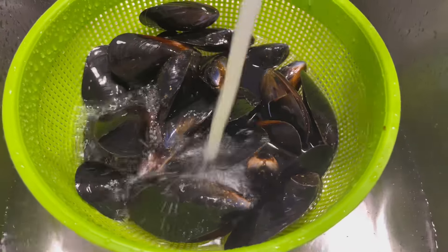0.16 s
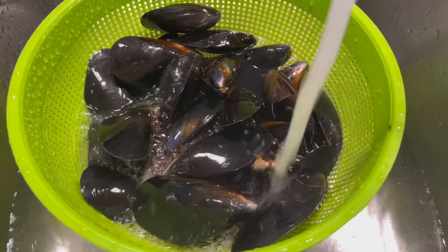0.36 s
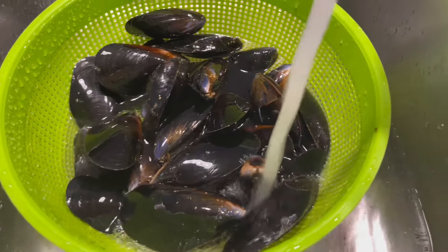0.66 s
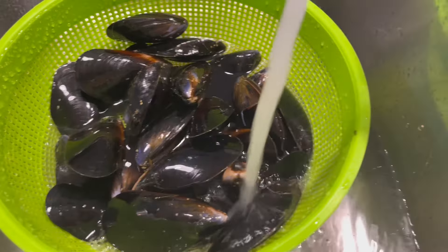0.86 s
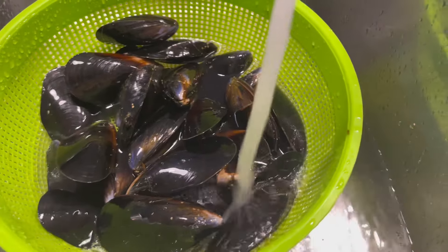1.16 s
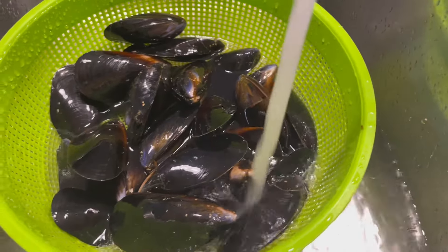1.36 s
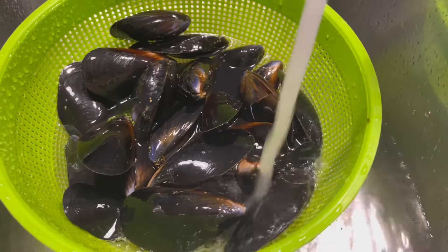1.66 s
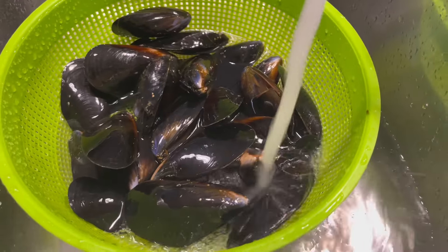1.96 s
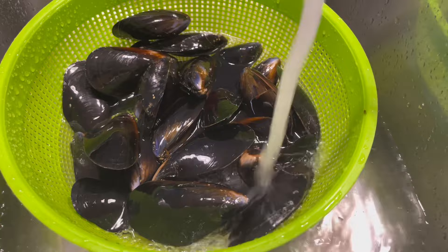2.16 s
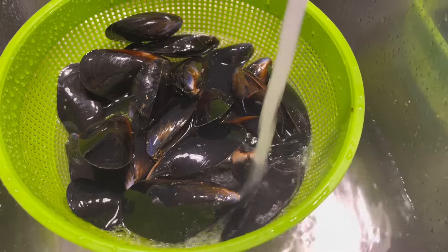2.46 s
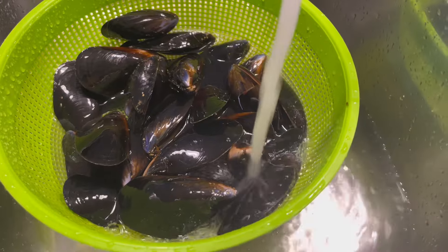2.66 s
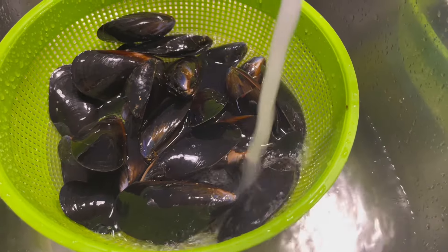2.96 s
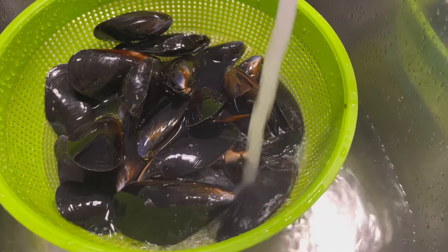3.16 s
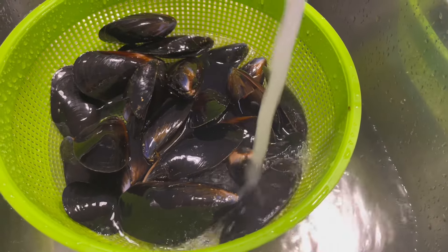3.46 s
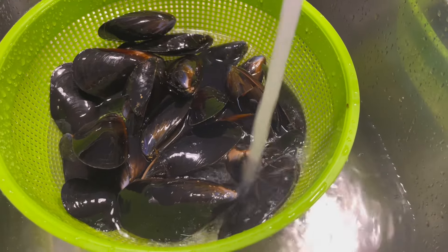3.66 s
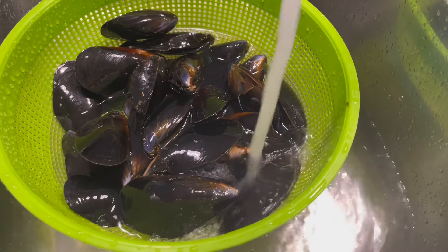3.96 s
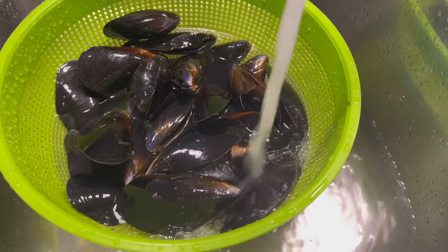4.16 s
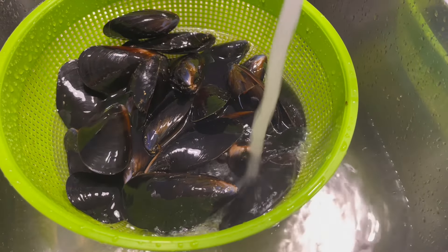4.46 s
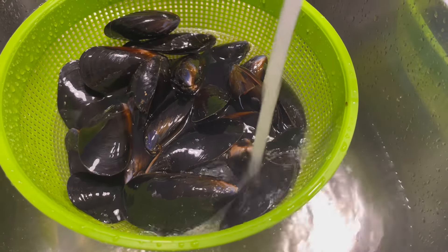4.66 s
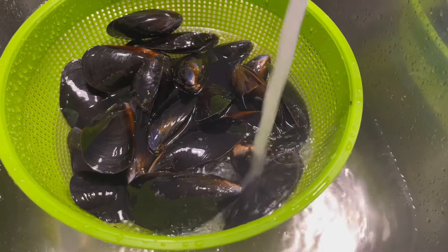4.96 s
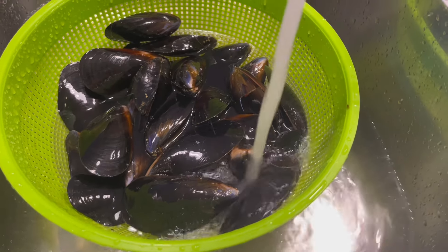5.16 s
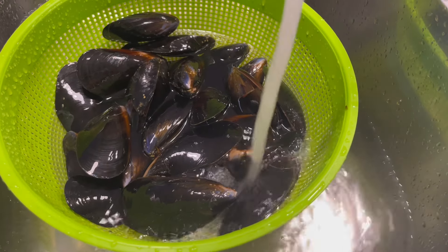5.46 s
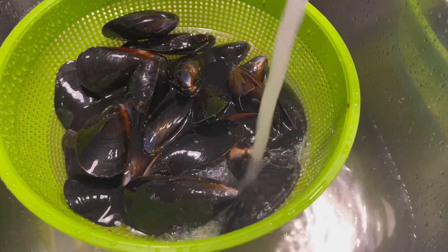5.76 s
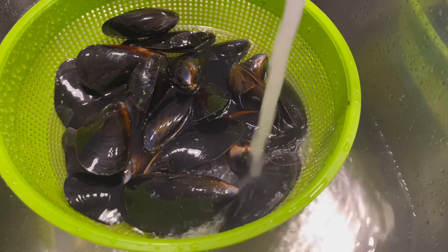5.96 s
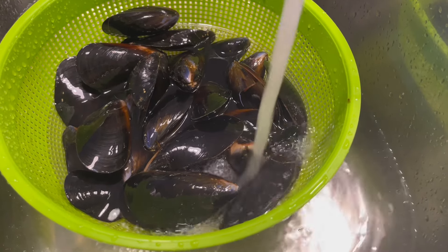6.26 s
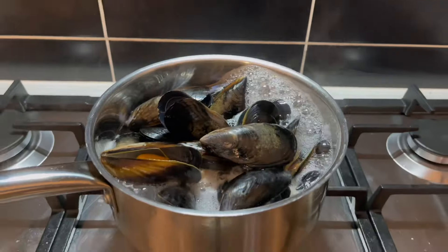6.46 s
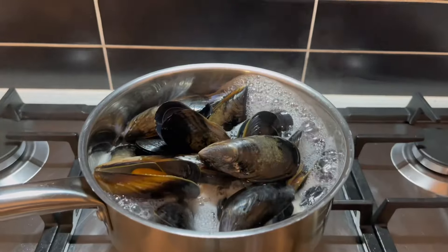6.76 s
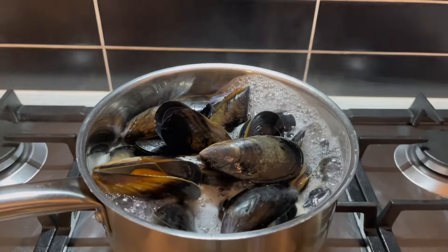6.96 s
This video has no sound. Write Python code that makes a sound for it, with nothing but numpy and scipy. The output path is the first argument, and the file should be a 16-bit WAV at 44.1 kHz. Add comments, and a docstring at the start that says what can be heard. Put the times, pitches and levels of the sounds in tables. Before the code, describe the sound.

Tap water splashes steadily onto mussels in a colander, with thuds against the steel sink, then a pot simmers faintly.

```python
"""A kitchen sink, then a stove: a tap runs onto mussels in a plastic colander that stands in a steel basin.
The jet spatters as filtered random impacts, bubbles and air gaps ring as sines and resonances,
run-off patters on the steel, air glugs, and struck modes make the basin thud, rumble and clack.
Then, abruptly, a pot of mussels simmers on a gas burner: coloured noise, small bubbles, sizzling foam, soft pops."""
import sys
import numpy as np
from scipy import signal
from scipy.fft import rfft, irfft
from scipy.io import wavfile
from scipy.ndimage import uniform_filter1d

SR = 44100
rng = np.random.default_rng(int(sys.argv[2]) if len(sys.argv) > 2 else 0)


def digitize_waveform(pressure):
    """Quantize a signal to 16-bit integers and store it at the path in sys.argv[1].

    Rows of a 2-D input are taken as channels; values are limited to [-1, 1].
    """
    field = np.atleast_2d(pressure).T
    bounded = np.clip(field, -1, 1)
    quanta = np.round(bounded * 32767).astype(np.int16)
    wavfile.write(sys.argv[1], SR, quanta)


N = 313545
T = np.arange(N) / SR
HZ = np.fft.rfftfreq(N, 1 / SR) + 1e-3
# The sink gives way to the stove [s]; top of the audible band [Hz]
CUT_S, TOP_HZ = 6.448, 15800

# The jet sweeps over bare shells, then settles in one place: (time [s], relative spray level [dB])
JET_SWEEP = [(0, -28), (.18, -26.5), (.33, -32), (.44, -27), (.6, -30), (1.1, -30.5), (2.5, -31.5),
             (6.4, -30)]
# Fill of the pocket between the shells where the jet lands: (time [s], relative level of its ring [dB])
POCKET_FILL = [(0, -13), (.3, -5), (.45, -9), (.65, 4), (1.5, 4), (3.5, 3.5), (5, 3), (6.45, 1.7)]
# Air gaps between the shells: (frequency [Hz], nominal width [Hz], relative level [dB])
AIR_GAPS = [(1574, 64, -14.5), (1854, 190, -5.5), (2170, 156, -3.5), (2410, 180, -4), (2590, 67, -4),
            (2757, 154, 3), (2940, 86, -4), (3035, 74, 0.5), (3265, 82, -3.5)]
# Spectrum of droplets ticking on shell: (frequency [Hz], relative density [dB per Hz])
SPRAY_SPECTRUM = [(1000, -29), (2000, -13), (4000, -31), (6200, -15), (8300, -12), (9300, -1), (9900, -5.5),
                  (10600, 5.5), (11250, 0), (12300, -9.5), (13200, -18.5), (14000, -52), (15200, -22.5)]
# Spectrum of water churning between the shells: (frequency [Hz], relative density [dB per Hz])
WASH_SPECTRUM = [(700, -18), (1050, -8.5), (1330, 2), (2000, -5), (3300, 2.5), (3900, -1.5), (4900, -1),
                 (5350, -1.5), (5750, -2.5), (6300, 0.5), (7300, -3.5), (8400, -1.5), (9000, 1),
                 (10100, -48), (11200, 9), (13000, -27)]
# Spectrum of run-off on the steel: (frequency [Hz], relative density [dB per Hz])
RUNOFF_SPECTRUM = [(25, -35), (55, -5), (110, -6.5), (180, -6.5), (300, -1.5), (450, 0.5), (620, 1.5),
                   (800, -7), (1100, -12.5), (2000, -39)]
# Spectrum of the gas burner: (frequency [Hz], relative density [dB per Hz])
BURNER_SPECTRUM = [(18, -37.5), (30, -18), (92, 1), (192, -12.5), (267, -6), (600, -17.5), (1000, -14),
                   (1750, -12), (3300, -31), (5910, -28), (6890, -38), (8200, -23), (8900, -36),
                   (10100, -50), (11400, -34), (13000, -52)]
# Spectrum of sizzling foam: (frequency [Hz], relative density [dB per Hz])
SIZZLE_SPECTRUM = [(1200, -21), (2200, -6), (2700, 0), (3400, -11), (4700, -9), (5700, -4), (6700, -11),
                   (8000, -3), (9000, -5), (10300, -17), (13000, -39)]
# Spectrum of a hard knock on the basin: (frequency [Hz], relative density [dB per Hz])
CLACK_SPECTRUM = [(40, -45), (400, -27), (900, -15), (1200, -13.5), (1400, -10.5), (1700, -7), (2100, -9),
                  (2600, -15), (3600, -24), (4700, -15), (5600, -27), (7000, -28.5), (13000, -53)]
# Spray between the two channels: (frequency [Hz], phase by which the right leads [rad])
SPRAY_LEAD = [(3000, 0.36), (8500, 1.33), (9300, 1.74), (10100, np.pi), (10500, 3.38), (11100, 4.72),
              (11750, 2 * np.pi)]
# Big drops that smack the shells: (time [s], relative peak [dB])
BIG_DROPS = [(0.241, -17.5), (1.124, -23), (2.157, -21), (2.668, -20), (2.9283, -24), (3.8761, -18),
             (4.6144, -21), (4.9283, -30), (5.039, -25.5), (5.091, -18), (5.5493, -20), (5.7997, -19)]
# The jet catches hollow shells and gulps:
# (middle [s], level before its swell [dB], centre [Hz], nominal width [Hz], length [s])
SHELL_GULPS = [(0.162, -35.5, 1640, 600, 0.051), (0.217, -39, 1470, 500, 0.065),
               (0.291, -28.5, 2000, 1500, 0.018), (0.368, -34.5, 2300, 800, 0.022),
               (0.521, -33, 2240, 600, 0.023), (0.68, -36, 2300, 800, 0.062),
               (2.397, -32, 2370, 400, 0.016), (3.15, -28, 2770, 400, .012),
               (3.733, -33, 2760, 400, 0.0086), (3.9, -29, 2750, 400, 0.01), (5.072, -28, 2800, 400, .012),
               (6.231, -30.5, 2800, 700, .014)]
# Air glugs in the draining water: (time [s], direct peak [dB], starting pitch [Hz], length [cycles])
AIR_GLUGS = [(3.066, -34, 330, 7), (3.098, -39, 205, 9), (3.14, -33, 190, 4), (3.932, -34, 310, 12),
             (4.478, -19.5, 249, 7), (4.490, -22, 473, 15), (4.504, -21.5, 278, 9.1), (4.523, -21, 233, 5),
             (4.544, -21.5, 240, 6), (4.560, -20, 450, 8.1), (4.576, -26.5, 212, 5.5),
             (4.596, -25.5, 181, 3), (4.640, -25, 215, 4.1), (4.689, -35, 219, 7), (5.682, -19.5, 268, 6.7),
             (5.71, -25.5, 255, 4.5)]
# Modes of the steel basin: (frequency [Hz], relative level [dB], t60 [s])
BASIN_MODES = [(78.5, -25, 0.41), (98.2, -21.5, 0.45), (175.8, -4.5, 0.31), (222.6, -14.5, 0.43),
               (258, -15.5, 0.19), (301, -8.5, 0.39), (341.5, -4, 0.23), (389.5, -13.5, .25),
               (483, -26, 0.13), (542, -12, 0.49), (642, -12, 0.23), (730, -8, 0.14), (820, -13, 0.12)]
# Blows on the basin: (time [s], thud level [dB], push on the modes [dB], contact time [ms])
BASIN_BLOWS = [(-.004, -23, -36, 1.5), (0.0136, -29.5, -38, 0.82), (0.2134, -22.5, -42, 1.2),
               (0.6207, -15.5, -42, 0.56), (0.8368, -21.5, -37, 0.87), (1.864, -29.5, -53, 1.6),
               (3.917, -35, -20, 3.3), (4.306, -45, -52, 1.5), (4.4776, -28, -36, 1.8),
               (4.553, -41, -38, 1.2), (4.584, -30, -30, 2.4), (5.675, -26, -29.5, 0.99),
               (5.9479, -23, -10, 3.4)]
# The load shifts and the basin rumbles:
# (time [s], rumble level [dB], centre [Hz], swell [s], t60 [s], level of the floor's boom [dB])
LOAD_SHIFTS = [(0.547, -40.5, 191, .01, 0.32, -64), (3.015, -38.5, 403, 0.016, 0.62, -39),
               (3.045, -36, 201, .025, 0.48, -33), (3.17, -51, 200, .04, .9, -41),
               (4.306, -37, 284, 0.0044, 0.7, -46), (4.478, -28.5, 252, 0.0036, 0.93, -56),
               (4.555, -35, 250, .005, 0.27, -34.5), (4.64, -37, 250, .005, 0.3, -49),
               (4.735, -33, 255, 0.012, 0.64, -41), (5.03, -38, 290, .02, 0.84, -47),
               (5.676, -29.5, 270, .01, 0.74, -30), (5.928, -29, 215, 0.023, 0.67, -40)]
# Hard knocks on the basin, the loudest among light touches and rebounds: (time [s], relative peak [dB])
HARD_KNOCKS = [(0.6214, -16), (5.94, -26), (5.943, -17), (5.946, -1.5), (5.9518, -20), (5.959, -16),
               (5.975, -21), (5.991, -16)]
# Bubbles that burst in the pot: (time [s], ring peak [dB], pitch [Hz], length [cycles])
POT_POPS = [(6.504, -42, 1550, 4), (6.5872, -39, 1630, 4), (6.618, -53, 5800, 5), (6.624, -51, 5500, 6),
            (6.63, -37, 6370, 7.1), (6.630, -45, 1680, 4.4), (6.757, -49, 1100, 7.2), (6.776, -45, 1450, 3),
            (6.7833, -46, 1600, 6), (6.7874, -35, 1350, 3.8), (6.793, -48, 6000, 4), (6.807, -45, 1400, 5),
            (6.909, -31, 1470, 4.8), (7.0803, -47, 8800, 7.4)]
# Foam swells and collapses in puffs: (time [s], relative level [dB])
FOAM_PUFFS = [(6.61, -59), (6.66, -69), (6.755, -64)]

# The flow is never quite even: slow surges and a quick flutter [dB]
SURGE_DB, FLUTTER_DB = 0.84, 0.93
# Random smaller drops: middle of the relative peaks and their reach either way [dB]
DROP_DB, DROP_SPREAD_DB = -21.5, -5
# Bubbling between the shells [dB], and the share of the pocket's fill it follows
CHURN_DB, CHURN_FOLLOWS = -37, 0.059
# Splash and gulps reach the right later [ms]
SPLASH_LAG_MS = 0.4956
# Each gap fills and drains on its own: slow and quick level change [dB], pitch waver [share]
GAP_SWAY_DB, GAP_FLICKER_DB, GAP_WOBBLE = -0.06, 2.0, .008
# A glug's phase runs ahead by this share per unit of age, so its pitch rises
GLUG_GLIDE = 0.0039
# Share of the pocket's fill that the run-off follows
RUNOFF_FOLLOWS = .15
# Low judder after each thud: level against the thud [dB], centre [Hz], t60 [s]
AFTER_DB, AFTER_HZ, AFTER_T60_S = -15, 112, 0.19
# The floor booms after a shift: delay [s], centre [Hz], t60 [s]
BOOM_LAG_S, BOOM_HZ, BOOM_T60_S = 0.0129, 61, 0.41
# Hard shifts rattle: level [dB] at a rumble of HARD_DB, dB gained per dB of rumble, centre [Hz], t60 [s]
HARD_DB, RATTLE_DB, RATTLE_GROWTH, RATTLE_HZ, RATTLE_T60_S = -28, -29.5, 2.1, 580, 0.38
# Froth wells up once: middle [s], length [s], level before its swell [dB]
WELL_S, WELL_LENGTH_S, WELL_DB = 6.685, .115, -60
# Foam puffs: attack [s], t60 [s]; steady sizzle between them [dB]
PUFF_ATTACK_S, PUFF_T60_S, FOAM_DB = 0.021, 0.25, -72.5
# The film of a bursting bubble snaps: level against the pop [dB], t60 [s]
SNAP_DB, SNAP_T60_S = -26, .006


def undb(db):
    """Decibels to gain."""
    return 10 ** (np.asarray(db) / 20)


def level(x, db):
    """Set the rms level."""
    return x * undb(db) / np.sqrt(np.mean(x ** 2))


def curve(rows):
    """A time table joined by straight lines."""
    return np.interp(T, *np.transpose(rows))


def since(s):
    """Seconds since a moment, zero before it."""
    return np.maximum(T - s, 0)


def pan(db):
    """Gains of left and right for a level difference; positive leans left."""
    return undb(np.array([[db], [-db]]) / 2)


def colour(x, points):
    """Minimum-phase filter with the given spectrum."""
    hz, db = np.transpose(points)
    grid_hz = np.fft.rfftfreq(4096, 1 / SR) + 1
    gain = undb(np.interp(np.log(grid_hz), np.log(hz), db))
    cepstrum = irfft(np.log(gain))
    # Folding the cepstrum forward makes the response causal
    cepstrum[1:2048] *= 2
    cepstrum[2049:] = 0
    response = irfft(np.exp(rfft(cepstrum)))
    return signal.oaconvolve(np.atleast_2d(x), response[None], axes=1)[:, :x.shape[-1]]


def band(x, hz, width):
    """A resonance with gain 1 at its centre."""
    return signal.lfilter(*signal.iirpeak(min(hz, .45 * SR), hz / width, SR), x)


def walk(rate):
    """Smooth random drift with a spread near 1; rate is new values per second."""
    k = int(SR / rate)
    steps = np.repeat(rng.standard_normal(N // k + 1), k)
    return 1.3 * uniform_filter1d(uniform_filter1d(steps, k), k)[:N]


def impacts(rate, spread_db):
    """Random tiny impacts, most weak and a few strong."""
    size = undb(spread_db * np.minimum(rng.exponential(size=N), 6))
    hits = rng.random(N) < rate / SR
    return level(hits * size * rng.choice([-1, 1], N), 0)


def stereo(draw, apart, lag_ms=0.):
    """Two draws of a sound as middle and side; the right may arrive later."""
    left, right = draw() + apart * draw() * np.array([[1], [-1]])
    t = T[:len(left)]
    return np.array([left, np.interp(t - lag_ms / 1000, t, right)])


def add(out, s, x):
    """Mix x into out at time s."""
    i = int(round(s * SR))
    x = x[..., max(-i, 0):max(N - i, 0)]
    out[..., max(i, 0):max(i, 0) + x.shape[-1]] += x


def room(x, t60, wet_db, lag_ms=0.):
    """The direct sound, optionally later on the right, and a dense tail of reflections."""
    t = T[:SR // 2]
    tail = rng.standard_normal((2, len(t))) * undb(-60 * t / t60) * (t > .001)
    tail *= undb(wet_db) / np.sqrt(np.sum(tail[0] ** 2))
    x = x.ravel()
    direct = np.array([x, np.interp(T - lag_ms / 1000, T, x)])
    return direct + signal.oaconvolve(x[None], tail, axes=1)[:, :N]


def bubbles(centre_hz, octaves, cycles, glide, spread_db, count):
    """Small bubbles ring and rise in pitch, each from its own place."""
    out = np.zeros((2, N))
    places = rng.random((count, 2))
    characters = rng.standard_normal((count, 2))
    sizes = rng.exponential(size=count)
    for when, lag, pitch, side, size in np.column_stack([places, characters, sizes]):
        hz = centre_hz * 2 ** (octaves * np.clip(pitch, -2.5, 2.5))
        t = T[:int(SR * cycles / hz) + 1]
        arrival_s = np.array([[lag], [1 - lag]]) * 0.00035
        age = np.maximum(t - arrival_s, 0) * hz / cycles  # falls 60 dB by age 1
        ring = np.sin(2 * np.pi * cycles * age * (1 + glide * age)) * undb(-60 * age)
        add(out, when * T[-1], ring * undb(spread_db * min(size, 4)) * pan(2 * side))
    return out


def spray(jet_db):
    """Droplets tick and smack on the shells; their sharp treble reaches the two channels out of step."""
    ticks = level(colour(impacts(rate=9000, spread_db=3.0), SPRAY_SPECTRUM), 3.65)
    ticks = ticks * undb(jet_db + FLUTTER_DB * walk(50))
    small_drops = [(when * CUT_S, DROP_DB + DROP_SPREAD_DB * (2 * size - 1))
                   for when, size in rng.random(size=(12, 2))]
    t = T[:SR // 100]
    for s, db in list(BIG_DROPS) + small_drops:
        burst = rng.standard_normal(len(t)) * np.exp(-((t - .0014) / 0.0026) ** 2)
        smack = colour(burst, SPRAY_SPECTRUM)
        add(ticks, s, smack / abs(smack).max() * undb(db + 7.0))
    lead = np.interp(HZ, *np.transpose(SPRAY_LEAD))
    right = irfft(rfft(ticks) * np.exp(1j * lead), N)
    return np.vstack([ticks, right])


def splash(jet_db):
    """Water churns between the shells: a scattered wash, free bubbles, small splats and ringing air gaps."""
    fill_db = curve(POCKET_FILL)
    churn_db = CHURN_DB + CHURN_FOLLOWS * fill_db + 0.39 * walk(21.9)
    drops = stereo(lambda: impacts(rate=9000, spread_db=3.0), apart=0.66, lag_ms=SPLASH_LAG_MS)
    wash = level(colour(drops, WASH_SPECTRUM), -0.37)
    # The wash follows jet and churn half and half
    wash = wash * undb((jet_db + churn_db) / 2 + 0.98 * walk(25.15)) * pan(2.9)
    free = bubbles(centre_hz=2410, octaves=0.2505, cycles=46, glide=0.027, spread_db=3.5, count=2400)
    splats = bubbles(centre_hz=3010, octaves=0.576, cycles=13, glide=0.076, spread_db=3.5, count=1200)
    fine = bubbles(centre_hz=5257, octaves=.33, cycles=630, glide=0.019, spread_db=1.5, count=2200)
    gaps = sum(gap(hz, width, db) for hz, width, db in AIR_GAPS)
    bubbling = level(free, -6.0) * pan(4.7) + level(fine, -3.0) * pan(0.73) + level(splats, -12)
    bubbling = bubbling + level(gaps, -3.0) * undb(fill_db) * pan(7.3)
    return wash + undb(churn_db) * bubbling


def gap(hz, width, db):
    """One air gap resonates under the drops; its pitch and loudness waver as the water sloshes."""
    drive = stereo(lambda: impacts(rate=1500, spread_db=2.0), apart=0.49, lag_ms=0.075)
    ring = band(band(drive, hz, width * 1.12), hz, width * 1.34)
    clock = T + GAP_WOBBLE * np.cumsum(walk(18)) / SR  # uneven playback bends the pitch
    wavering = np.array([np.interp(clock, T, side) for side in ring])
    return wavering * undb(db + GAP_SWAY_DB * walk(3.31) + GAP_FLICKER_DB * walk(24.13))


def gulps():
    """A cluster of bubbles rings one hollow shell for a moment."""
    drive = stereo(lambda: impacts(rate=2500, spread_db=1.5), apart=0.86, lag_ms=SPLASH_LAG_MS)
    out = np.zeros((2, N))
    for s, db, hz, width, length in SHELL_GULPS:
        ring = level(band(band(drive, hz, width), hz, width), db)
        out += ring * np.exp(-(2 * (T - s) / length) ** 2)
    return out * pan(7.1)


def runoff():
    """Water leaves the colander and patters on the steel floor, which rings faintly."""
    drops = stereo(lambda: impacts(rate=1200, spread_db=2.0), apart=0.34, lag_ms=0.25)
    patter = colour(drops, RUNOFF_SPECTRUM)
    ringing = steel(band(band(patter, 490, 352), 490, 353))
    flow = undb(RUNOFF_FOLLOWS * np.minimum(curve(POCKET_FILL), 0))
    gurgle = bubbles(centre_hz=450.6, octaves=0.377, cycles=56, glide=0.038, spread_db=2.5, count=500)
    on_steel = (level(patter, -47.0) + level(ringing, -55.5)) * undb(1.3 * walk(5.12))
    return (on_steel + level(gurgle, -50.0)) * flow * pan(0.93)


def glugs():
    """Big pockets of air break loose in the water; each swells, rings for a few cycles and rises in pitch."""
    out, t = np.zeros(N), T[:SR // 8]
    for s, db, hz, cycles in AIR_GLUGS:
        age = 4 * t * hz / cycles  # loudest at age 1
        swell = (age * np.exp(1 - age)) ** 2
        add(out, s, undb(db) * swell * np.sin(2 * np.pi * hz * t * (1 + GLUG_GLIDE * age)))
    return room(out, t60=0.21, wet_db=-10, lag_ms=0.48) * pan(.5)


def basin():
    """Blows and rumbles in the steel; bending waves bring the high notes first, so a thud falls in pitch."""
    thuds, push, drone = np.zeros(N), np.zeros(N), np.zeros((2, N))
    t = T[:SR // 2]
    top_hz, end_hz, fall_s, swell_s = 600, 105, 0.0065, 0.0034
    chirp = np.sin(2 * np.pi * (end_hz * t + (top_hz - end_hz) * fall_s * (1 - np.exp(-t / fall_s))))
    chirp *= (t / swell_s * np.exp(1 - t / swell_s)) ** 2
    for s, thud_db, ring_db, contact_ms in BASIN_BLOWS:
        add(thuds, s, undb(thud_db) * chirp)
        contact = np.sin(np.pi * np.minimum(t * 1000 / contact_ms, 1))
        add(push, s, undb(ring_db) * contact / contact.sum())
        add(drone, s + swell_s, judder(AFTER_HZ, thud_db + AFTER_DB, AFTER_T60_S))
    for s, db, hz, swell, t60, boom_db in LOAD_SHIFTS:
        rattle_db = RATTLE_DB + RATTLE_GROWTH * (db - HARD_DB)
        rumble = judder(hz, db, t60, swell)
        add(drone, s, rumble + judder(RATTLE_HZ, rattle_db, RATTLE_T60_S, swell))
        add(drone, s + BOOM_LAG_S, judder(BOOM_HZ, boom_db, BOOM_T60_S, swell) * pan(-2.5))
    return room(thuds, t60=0.154, wet_db=-3.0, lag_ms=0.48) + steel(push) + drone * pan(.5)


def judder(hz, db, t60, swell_s=0.00076):
    """A shudder of the steel swells and dies; part drives the modes, drawing it out into a hollow note."""
    t = T[:SR // 2]
    shake = stereo(lambda: rng.standard_normal(len(t)), apart=0.36, lag_ms=0.29)
    around = signal.butter(2, [hz * 0.72, hz * 1.35], "band", fs=SR, output="sos")
    shake = signal.sosfilt(around, shake)
    envelope = np.minimum(t / swell_s, 1) * undb(-60 * np.maximum(t - swell_s, 0) / t60)
    return level(level(shake, 0) + level(steel(shake), -6.0), db) * envelope


def steel(x):
    """The basin's modes answer a push; they build up as the waves cross the floor."""
    t = T[:SR // 2]
    ring = sum(undb(db - 60 * t / t60) * np.sin(2 * np.pi * (hz * t + rng.random()))
               for hz, db, t60 in BASIN_MODES)
    ring = ring * (1 - np.exp(-t / 0.0025))
    return signal.oaconvolve(np.atleast_2d(x), ring[None], axes=1)[:, :x.shape[-1]]


def clack():
    """Hard knocks, leaning left, are filtered clicks; the basin echoes them briefly."""
    knocks = np.zeros(N)
    for s, db in HARD_KNOCKS:
        add(knocks, s, undb([db]))
    out = colour(knocks, CLACK_SPECTRUM)
    out = out * abs(knocks).max() / abs(out).max()
    return room(out, t60=0.22, wet_db=-3, lag_ms=0.567) * pan(1.9)


def pot():
    """The broth simmers unevenly, froth and foam swell, and bubbles burst by a tiled wall over the burner."""
    simmer = bubbles(centre_hz=1390, octaves=0.36, cycles=15, glide=.05, spread_db=0.5, count=1800)
    simmer = level(simmer, -65.0) * undb(2.0 * walk(42))
    froth = bubbles(centre_hz=2400, octaves=0.19, cycles=51, glide=.02, spread_db=0.0, count=5000)
    froth = level(froth, WELL_DB) * np.exp(-(2 * (T - WELL_S) / WELL_LENGTH_S) ** 2)
    bed = burner() + simmer + froth + foam()
    return pops() + bed * pan(-1.2) + whistle()


def pops():
    """Bursting bubbles: a short swelling sine and the noisy snap of the film, echoed by the tiled wall."""
    out, t = np.zeros(N), T[:SR // 50]
    for s, db, hz, cycles in POT_POPS:
        age = 4 * t * hz / cycles  # loudest near age 1
        ring = (age * np.exp(1 - age)) ** 3 * np.sin(2 * np.pi * hz * t)
        snap = rng.standard_normal(len(t)) * undb(SNAP_DB - 60 * t / SNAP_T60_S)
        add(out, s, undb(db) * (ring + snap))
    return room(out, t60=0.075, wet_db=-5.5) * pan(-2.1)


def foam():
    """Tiny impacts of the foam sizzle steadily and in puffs that swell and collapse."""
    puffs = np.zeros(N)
    for s, db in FOAM_PUFFS:
        attack = np.minimum(since(s) / PUFF_ATTACK_S, 1)
        puffs += attack * undb(db - 60 * since(s + PUFF_ATTACK_S) / PUFF_T60_S)
    sizzle = colour(stereo(lambda: impacts(rate=2800, spread_db=3.5), apart=1.0), SIZZLE_SPECTRUM)
    return level(sizzle, 0) * np.hypot(undb(FOAM_DB), puffs)


def burner():
    """The gas flame rumbles as coloured noise of drifting strength."""
    noise = stereo(lambda: rng.standard_normal(N), apart=0.36)
    return level(colour(noise, BURNER_SPECTRUM), -62.5) * undb(2.0 * walk(9.2))


def whistle():
    """The burner whistles faintly: noise through two neighbouring resonances."""
    return level(band(band(rng.standard_normal((2, N)), 3780, 90), 3700, 90), -79)


def scene():
    """The sink, then at once the stove."""
    jet_db = curve(JET_SWEEP) + SURGE_DB * walk(16)
    sink = spray(jet_db) + splash(jet_db) + gulps() + runoff() + glugs() + basin() + clack()
    at_sink = np.exp(-since(CUT_S) / 0.0016)
    return at_sink * sink + (1 - at_sink) * pot()


def record(dry):
    """Thin the deepest bass, round the loudest peaks and cut the top."""
    thinned = signal.sosfilt(signal.butter(2, 36, "high", fs=SR, output="sos"), dry)
    rounded = thinned / (1 + (thinned / .8) ** 4) ** .25
    return signal.sosfilt(signal.ellip(10, .2, 80, TOP_HZ, fs=SR, output="sos"), rounded)


dry = scene()
out = record(dry)
digitize_waveform(out)
```